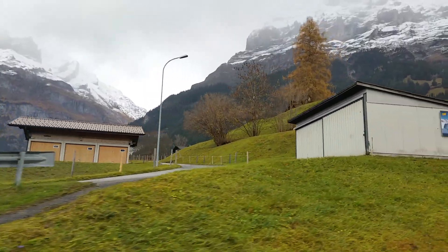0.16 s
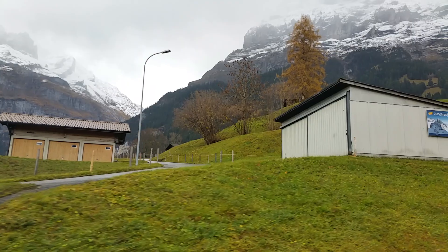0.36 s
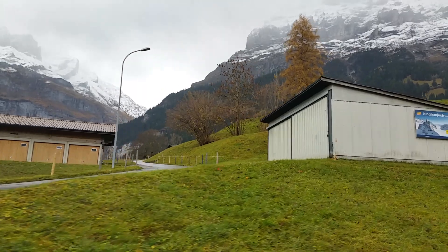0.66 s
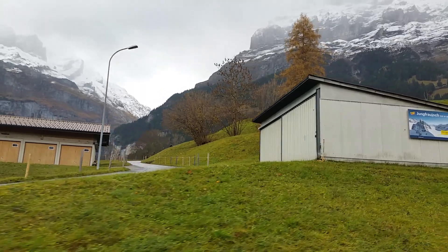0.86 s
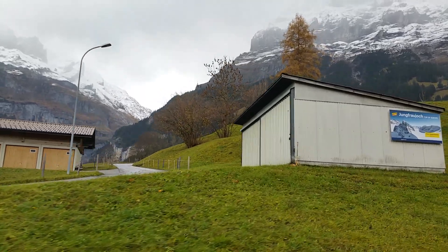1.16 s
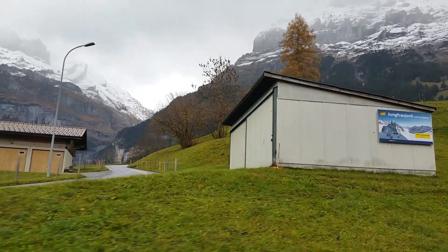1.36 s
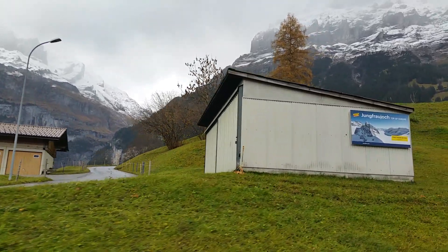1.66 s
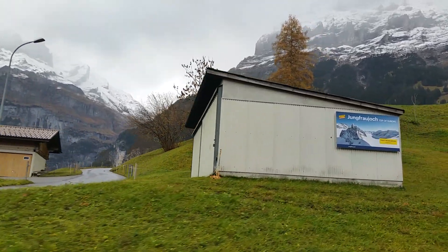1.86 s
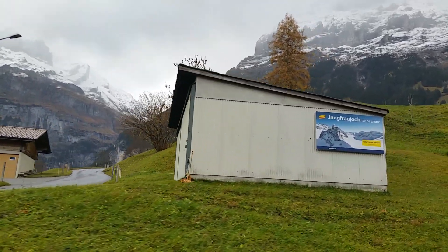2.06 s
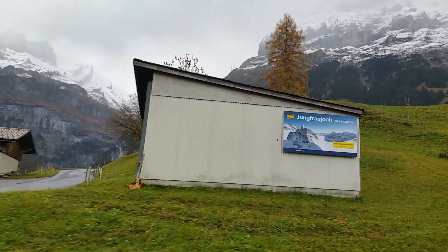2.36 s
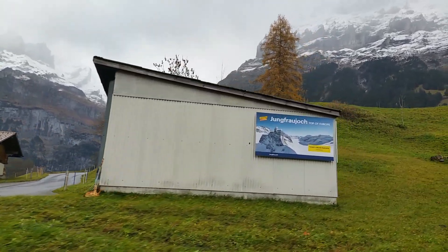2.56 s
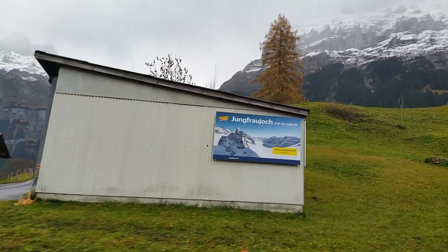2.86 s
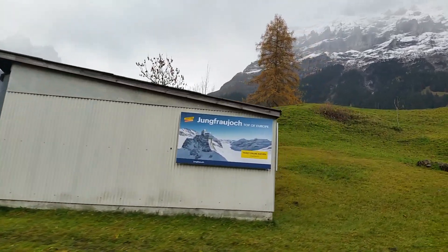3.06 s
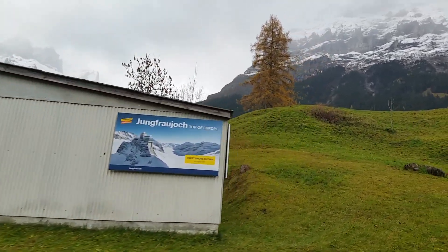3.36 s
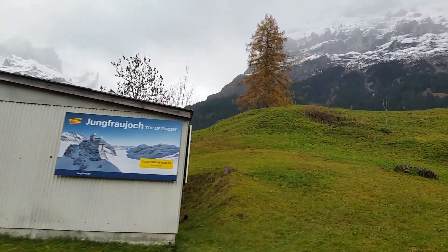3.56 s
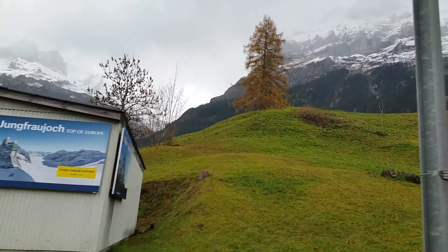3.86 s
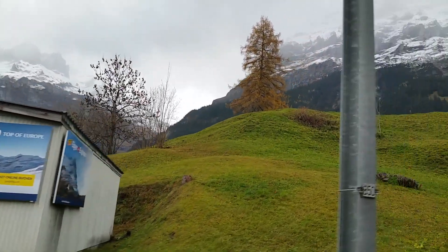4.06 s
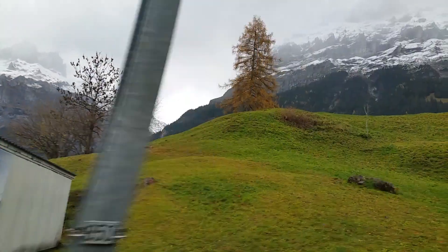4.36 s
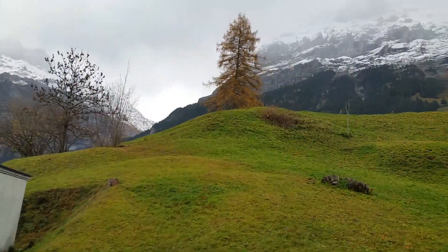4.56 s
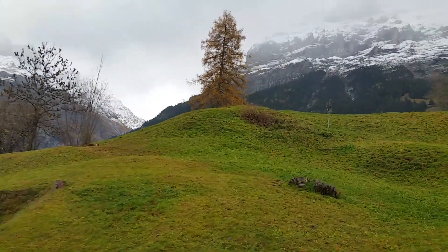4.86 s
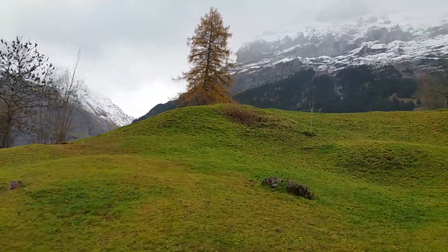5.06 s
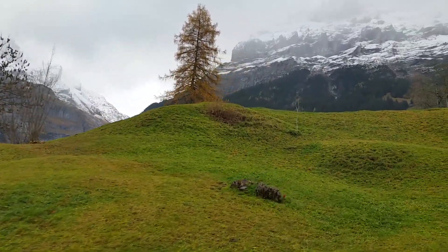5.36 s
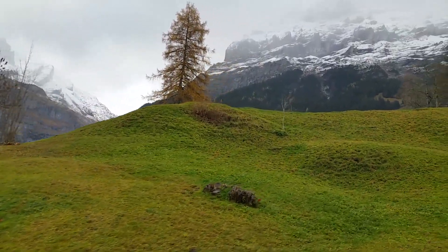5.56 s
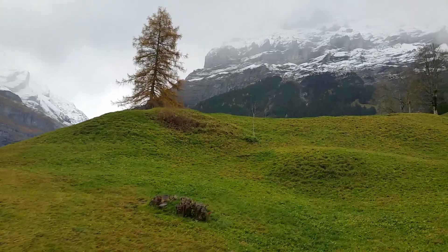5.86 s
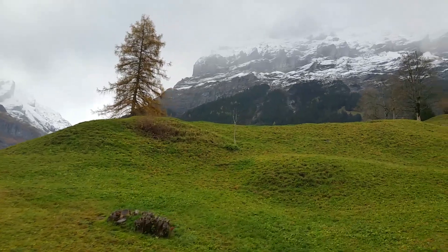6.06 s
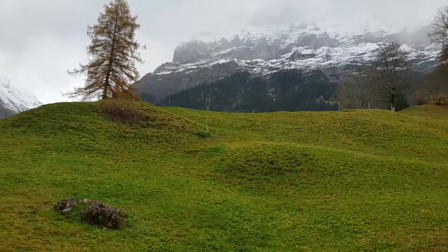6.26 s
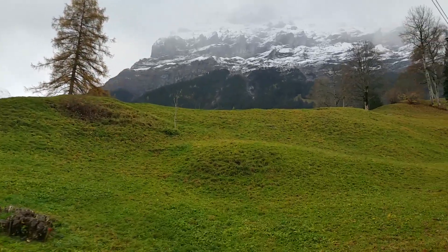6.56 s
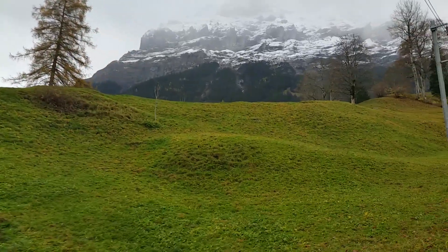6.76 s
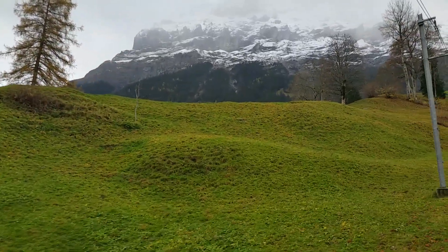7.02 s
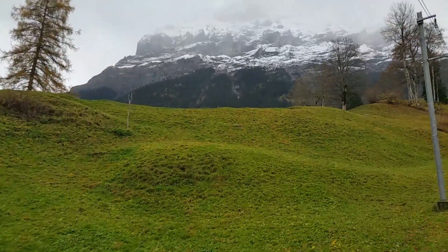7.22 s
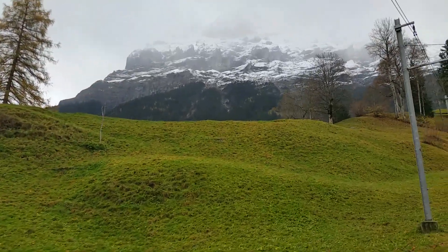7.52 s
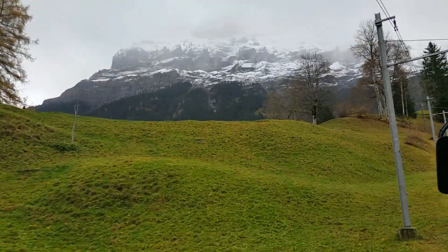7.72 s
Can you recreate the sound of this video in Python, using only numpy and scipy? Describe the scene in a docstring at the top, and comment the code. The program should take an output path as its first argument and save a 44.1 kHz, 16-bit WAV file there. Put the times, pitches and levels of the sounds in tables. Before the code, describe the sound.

A hand-held phone in a train car captures continuous cogwheel drive hum near the pitch of a low musical note, wheel roar and grainy rolling noise. Soft hiss through the open window swells beside a building, then eases. Two short, woody thumps come from under the floor around four seconds, less than half a second apart. The hum keeps wavering, sinking almost imperceptibly in pitch, with no stop.

```python
"""Inside a rack-railway car

A slowly climbing car with an open window, heard at the two microphone ports of a hand-held phone.
The pinion meets the rack tooth by tooth: sines on multiples of the tooth rate hum, and gear pairs
whine between them. Shaped noise makes the rumble of the wheels and the hiss from outside.
A rail joint knocks through the floor, whose modes ring as decaying sines."""
import sys
import numpy as np
from scipy import signal
from scipy.fft import rfft, irfft
from scipy.io import wavfile

SR = 44100
rng = np.random.default_rng(int(sys.argv[2]) if len(sys.argv) > 2 else 0)


def nominal_scale(level):
    """Amplitude ratio for a level in decibels (scalar or array-like)."""
    x = np.asarray(level, float) / 20
    return 10 ** x


def materialize(psi):
    """Save the field psi as 16-bit PCM at rate SR to the path in sys.argv[1].

    A 1-D psi becomes a single channel; in a 2-D psi each row is a channel.
    """
    bounded = np.clip(np.atleast_2d(psi).T, -1, 1)
    quanta = np.round(bounded * 32767).astype(np.int16)
    wavfile.write(sys.argv[1], SR, quanta)


N = 347949   # length in samples

# How fast the pinion runs along the rack. Each row: time in seconds, rack teeth per second.
TOOTH_RATE = [(0.0, 55.28), (2.15, 54.88), (3.59, 54.58), (4.3, 54.47), (5.74, 54.09), (6.8, 53.97),
              (7.89, 53.97)]
# The loudest hum, three times the tooth rate, swells and sags. Each row: time in seconds, level in dB.
HUM_LEVEL = [(0.0, -19.5), (0.55, -21.5), (1.25, -18), (2.2, -21.5), (2.6, -26), (3.2, -21.5), (3.9, -23),
             (4.4, -20.5), (4.65, -23.5), (4.9, -18), (6.2, -19.5), (6.8, -24.5), (7.3, -19), (7.89, -20.5)]
# Brief chance rises and dips in level around the hum's pitch, where hum and rumble noise meet.
# Each row: middle in seconds, change in dB.
HUM_CHANCE_CHANGES = [(0.47, -5.5), (0.77, 3), (1.06, -5), (1.72, -9.5), (3.02, -4), (3.22, 4.5),
                      (3.48, -5), (3.89, -17), (4.42, 4.5), (4.57, -5), (5.32, -4.5), (5.68, -3),
                      (6.03, -5), (7.0, 7.5), (7.14, -7), (7.63, -2)]
HUM_CHANGE_S = 0.045
TEETH_PER_TURN = 20.1   # of the pinion
# Tones whose strength wanders as the car body and gear load change. Each entry: multiple of the tooth rate.
WANDERING_MULTIPLES = [1, 2, 4, 6, 6.1, 12.2, 17.2, 24.4]
# How each of them wanders. Each row: base level in dB, dB gained per tooth a second of slowing,
# share of the outside noise's swing (below 0: it moves the opposite way).
WANDER_RULES = [(-35, -2, 0), (-27.5, -3.5, -0.0065), (-33, 1.5, 0.87), (-31.5, -2.5, -0.86),
                (-34.5, 0, -0.6), (-32.5, -6.5, 0.62), (-45.5, 3.5, -0.26), (-57, 9, 0.23)]
WANDER_DB, WANDER_HZ = 1.0, 1.2   # slow chance on top: spread and pace
# Tones with steadier strength. Each entry: multiple of the tooth rate.
STEADY_MULTIPLES = [4.85, 5, 7, 8, 9, 9.15, 10, 11, 13, 14, 15, 21.4, 27.3, 30.5, 36.6, 42.7]
# Their strength halfway on to the next rail. Each entry: level in dB.
STEADY_LEVELS = [-36, -38, -45.5, -43, -44, -48, -46, -56, -46.5, -55.5, -53.5, -58.5, -57.5, -62.5, -59,
                 -65]
# Uneven teeth smear each tone.
HUM_SMEAR_DB = -13   # beside the tone
# Smear of the wandering tones. Each entry: dB beside the tone.
WANDERING_SMEAR = [0, -9, 2, -5, -6, -4, -5, -1.5]
# Smear of the steady tones. Each entry: dB beside the tone.
STEADY_SMEAR = [-3, -2, 4.5, -2, 2, 3, 6, 3, 2, -2, 4.5, 6, 7, 7, 8, 8]
SMEAR_HZ, SMEAR_HZ_PER_MULTIPLE = 6.4, 0.36   # higher tones are shaken faster
# How the tones lean to one side. Each row: frequency in Hz, left minus right in dB.
TONE_BALANCE = [(60, -3), (150, -6), (370, -3), (910, 1.5), (2260, -6), (5590, -9.5), (13800, 3.0)]
ROAR_DB, ROAR_FADE_DB_PER_S = -0.17, 0.17   # low wheel roar against its spectrum
NEXT_RAIL_S, NEXT_RAIL_DB, NEXT_RAIL_EASE_S = 4.63, -2, 0.12   # past the joint the roar is softer
NEXT_RAIL_LOW_DB, NEXT_RAIL_HIGH_DB = -2.5, 2.5   # there the low steady tones sink, the high ones gain
# Rolling noise against its spectrum. Each row: time in seconds, change in dB.
ROLLING_LEVEL = [(0.0, -2), (0.35, 0.7), (0.6, -2.5), (1.5, -0.5), (3.55, -0.3), (3.7, 2.2), (5.0, 0.3),
                 (5.35, -1.5), (5.7, 0.6), (7.2, 1.3), (7.89, -2)]
# Colour of the low wheel roar. Each row: frequency in Hz, left in dB per Hz, right in dB per Hz.
ROAR_SPECTRUM = [(20, -62, -64), (46.6, -56, -46), (59.6, -60, -69), (72, -53.5, -45), (92, -57.5, -49),
                 (156, -43, -39.5), (159, -44.5, -43.5), (181, -52, -44.5), (198, -47, -44.5),
                 (251, -56, -51.5), (300, -54, -51), (423, -59.5, -54), (617, -54.5, -52),
                 (830, -61.5, -55.5), (1170, -69, -65.5)]
# Outside hiss, strongest while a wall stands near the track; only its swing about the mean counts.
# Each row: time in seconds, level in dB.
OUTSIDE_LEVEL = [(0.0, -49), (0.3, -47), (1.9, -44.5), (2.2, -43), (3.5, -42.5), (4.85, -42.5),
                 (5.3, -44.5), (5.55, -43), (7.2, -46), (7.89, -46)]
TOP_FADE_DB_PER_S = 0.2
# Brief surges and dips in the level of the hiss, partly shared by the wheel noise.
# Each row: middle in seconds, change in dB.
SURGES = [(0.15, 0), (0.44, 2), (0.57, 1.5), (0.97, 3), (1.12, 5), (1.32, 3.5), (1.69, 4), (2.2, 3),
          (2.33, -1), (2.44, 2), (2.93, 4), (3.45, 3), (3.68, 1), (3.87, 1.5), (4.29, 5), (4.41, -2),
          (4.47, 4.5), (4.61, -0.5), (4.75, 5), (4.87, 5.5), (5.15, 3), (5.76, 0.5), (6.31, 5),
          (6.47, -3.5), (7.36, 4), (7.44, 3.5), (7.54, -3.5), (7.75, 0.5)]
SURGE_S = 0.024
# Colour of the outside hiss. Each row: frequency in Hz, left in dB per Hz, right in dB per Hz.
HISS_SPECTRUM = [(3270, -83.5, -80.5), (4050, -83, -72.5), (4380, -81.5, -73.5), (4980, -85, -71.5),
                 (5650, -84.5, -74), (6490, -92.5, -82.5), (6990, -95, -84.5), (7550, -101, -101),
                 (8300, -93, -87.5), (9250, -85.5, -87.5), (10300, -86.5, -94), (11000, -89, -100),
                 (12000, -88.5, -93), (13000, -90.5, -91), (14200, -94, -96)]
# What the two ports share. Each row: frequency in Hz, likeness from 0 to 1, lead of the left port in radians.
PORT_LIKENESS = [(40, 0.57, .05), (160, 0.92, 0.14), (400, 0.83, 0.39), (700, 0.97, 0.64),
                 (1100, 0.89, 1.16), (1760, 0.5, 1.94), (2670, 0.04, 3.88), (4020, 0, 5.74),
                 (14000, 0.05, 20.4)]
# Blows of the rail joint under the wheels. Each row: time in seconds, strength in dB, centre in Hz.
KNOCKS = [(3.856, -12.5, 645), (3.860, -11, 300), (3.878, -7.5, 148), (4.265, -7, 300), (4.270, -12.5, 500),
          (4.287, -7, 350), (4.293, -17, 78), (4.350, -22, 50)]
# Ways the floor rings. Each row: frequency in Hz, strength in dB, seconds to fall by 60 dB.
FLOOR_MODES = [(50, 6.5, 0.53), (70, -1, .4), (148, 1.5, 0.046), (230, 8.5, 0.03), (300, -6, 0.051),
               (514, 6, 0.017), (613, 1, 0.038), (1047, 2, 0.059), (1450, -8, .05)]
# Colour of the middle rolling noise. Each row: frequency in Hz, left in dB per Hz, right in dB per Hz.
ROLLING_SPECTRUM = [(880, -56, -54), (1070, -69.5, -64.5), (1435, -67, -65), (2270, -73, -73),
                    (2660, -86.5, -79), (2830, -76.5, -76.5), (3060, -83, -84.5)]
# Borders between the bands of hiss. Each entry: frequency in Hz.
HISS_EDGES_HZ = [3100, 4300, 5500, 7800, 10000, 12000, 15500]

SECONDS = np.arange(N) / SR
PLUS_MINUS = np.array([[1], [-1]])   # left port up, right port down


def in_time(rows):
    """Draws straight lines between the rows of a table whose first column is time."""
    s, *columns = np.transpose(rows)
    return [np.interp(SECONDS, s, column) for column in columns]


def at_hz(points, hz, column=1):
    """Reads a table at any frequency, on a logarithmic frequency scale."""
    points = np.array(points)
    return np.interp(np.log(hz), np.log(points[:, 0]), points[:, column])


def drift(rate_hz, size=1):
    """Slow chance of spread 1: noise at every 40th sample through a double one-pole low-pass."""
    r = np.exp(-2 * np.pi * rate_hz * 40 / SR)
    noise = rng.standard_normal((size, N // 40 + 1502))
    slow = signal.lfilter([1], [1, -2 * r, r * r], noise)[:, 1500:]   # drop the filter's start
    return np.repeat(slow / slow.std(), 40, axis=1)[:, :N]


def brief(rows, width_s):
    """Bell-shaped rises and falls of level, in dB."""
    return sum(db * np.exp(-((SECONDS - s) / width_s) ** 2) for s, db in rows)


def once_a_turn(depth_db, turns):
    """A swell that returns with every turn of the pinion, at its top after the given share of a turn."""
    teeth = np.cumsum(in_time(TOOTH_RATE)[0]) / SR
    return depth_db * np.cos(2 * np.pi * (teeth / TEETH_PER_TURN - turns))


def outside_swing():
    """How far the outside noise lies above its mean, in dB."""
    level_db, = in_time(OUTSIDE_LEVEL)
    return level_db - np.mean(level_db)


def past_joint():
    """Rises from 0 to 1 as the car runs on to the next rail."""
    return 1 / (1 + np.exp((NEXT_RAIL_S - SECONDS) / NEXT_RAIL_EASE_S))


def port_noise(spectrum, low_hz, high_hz):
    """Noise between two edges, coloured for each port, partly shared, the left port leading."""
    hz = np.maximum(np.fft.rfftfreq(N, 1 / SR), 1)
    shared, left, right = rfft(rng.standard_normal((3, N)))
    alike = np.clip(at_hz(PORT_LIKENESS, hz), 0, 1)
    left = np.sqrt(alike) * shared + np.sqrt(1 - alike) * left
    left = left * np.exp(1j * at_hz(PORT_LIKENESS, hz, column=2))
    right = np.sqrt(alike) * shared + np.sqrt(1 - alike) * right
    edges = 1 / np.sqrt((1 + (low_hz / hz) ** 12) * (1 + (hz / high_hz) ** 12))
    per_hz = edges * np.sqrt(SR / 2)   # gives the noise a level of 0 dB per Hz between the edges
    left = left * nominal_scale(at_hz(spectrum, hz)) * per_hz
    right = right * nominal_scale(at_hz(spectrum, hz, column=2)) * per_hz
    return irfft([left, right], N)


def gear_tone(teeth, multiple, level_db, smear_db, own_share=0.055):
    """A sine locked to the tooth count; uneven teeth shake its height and phase, a little apart per port."""
    a, b, c, d = drift(SMEAR_HZ + SMEAR_HZ_PER_MULTIPLE * multiple, size=4)
    own = np.sqrt(own_share) * (c + 1j * d) * PLUS_MINUS
    smear = nominal_scale(smear_db) / np.sqrt(2) * (a + 1j * b + own)
    hz = multiple * TOOTH_RATE[0][1]
    lead = at_hz(PORT_LIKENESS, hz, column=2) * np.array([[1], [0]])   # left port only
    phase = 2 * np.pi * multiple * teeth + rng.uniform(0, 2 * np.pi) + lead
    wave = np.real((1 + smear) * np.exp(1j * phase))
    balance = nominal_scale(at_hz(TONE_BALANCE, hz) / 2 * PLUS_MINUS)
    return np.sqrt(2) * nominal_scale(level_db) * wave * balance


def drive():
    """Hum and whine of pinion and gears: all tones are locked to the count of rack teeth passed."""
    speed, = in_time(TOOTH_RATE)
    teeth = np.cumsum(speed) / SR
    slowed = speed[0] - speed
    outside_db = outside_swing()

    hum_db = in_time(HUM_LEVEL)[0] + once_a_turn(depth_db=0.8, turns=0.13)
    hum_db = hum_db + brief(HUM_CHANCE_CHANGES, HUM_CHANGE_S)
    out = gear_tone(teeth, multiple=3, level_db=hum_db, smear_db=HUM_SMEAR_DB)

    wander_db = []
    for base_db, gain_db, follows in WANDER_RULES:
        chance_db = WANDER_DB * drift(WANDER_HZ)[0]
        wander_db.append(base_db + gain_db * slowed + follows * outside_db + chance_db)
    for multiple, level_db, smear_db in zip(WANDERING_MULTIPLES, wander_db, WANDERING_SMEAR):
        out += gear_tone(teeth, multiple, level_db, smear_db)

    whine_db = wander_db[-2:]   # two fainter tones rise and fall with the highest wandering whines
    out += gear_tone(teeth, multiple=34.4, level_db=whine_db[0] - 8.5, smear_db=1.0)
    out += gear_tone(teeth, multiple=18.3, level_db=whine_db[1] - 2.5, smear_db=-3.5)

    for multiple, level_db, smear_db in zip(STEADY_MULTIPLES, STEADY_LEVELS, STEADY_SMEAR):
        change_db = NEXT_RAIL_LOW_DB if multiple < 20 else NEXT_RAIL_HIGH_DB
        out += gear_tone(teeth, multiple, level_db + change_db * (past_joint() - 0.5), smear_db)
    return out


def rumble(middle_share=0.48, roar_share=0.13):
    """Wheels on rail: a low roar that fades and a middle band that rises and falls; both share the surges."""
    surge_db = brief(SURGES, SURGE_S)
    low_db = ROAR_DB - ROAR_FADE_DB_PER_S * SECONDS + NEXT_RAIL_DB * past_joint()
    low_db = low_db + roar_share * surge_db + 0.68 * drift(10.4)
    roar = nominal_scale(low_db) * port_noise(ROAR_SPECTRUM, low_hz=12.0, high_hz=1005.0)
    middle_db = in_time(ROLLING_LEVEL)[0] + middle_share * surge_db
    middle_db = middle_db + once_a_turn(depth_db=0.4, turns=0.02) + 0.76 * drift(5.2)
    rolling = nominal_scale(middle_db) * port_noise(ROLLING_SPECTRUM, low_hz=1085.0, high_hz=3140.0)
    return roar + rolling


def hiss(patchy_db=0.9, top_follows=1.3, top_share=0.97):
    """Running noise through the window; all bands surge and dip, the top slightly less, and each flickers."""
    surge_db = brief(SURGES, SURGE_S) + once_a_turn(depth_db=0.64, turns=-0.00027) + 0.93 * drift(7.4)
    surge_db = surge_db + 0.57 * drift(30.0)   # quick flutter shared by all bands
    main_db = outside_swing() + surge_db
    top_fade_db = TOP_FADE_DB_PER_S * (SECONDS - N / 2 / SR)
    top_db = top_follows * outside_swing() + top_share * surge_db - top_fade_db
    out = 0
    for low, high in zip(HISS_EDGES_HZ, HISS_EDGES_HZ[1:]):
        band_db = (main_db if high < 8000 else top_db) + patchy_db * drift(8.0)
        out = out + nominal_scale(band_db) * port_noise(HISS_SPECTRUM, low, high)
    return out


def knocks(spread_octaves=0.66):
    """Each blow rings the floor modes near its own centre: hard blows the high ones, heavy ones the low."""
    s, blow_db, centre_hz = np.transpose(KNOCKS)
    out = np.zeros(N)
    for k, (hz, mode_db, t60) in enumerate(FLOOR_MODES):
        nearness = np.exp(-(np.log2(hz / centre_hz) / spread_octaves) ** 2)
        clicks = np.full(N, 1e-18)   # silent, but not exactly zero
        clicks[(s * SR).astype(int)] = nominal_scale(blow_db + mode_db) * nearness
        r = nominal_scale(-60 / (t60 * SR))   # what is left after each sample
        w = 2 * np.pi * hz / SR
        ring = signal.lfilter([0, np.sin(w)], [1, -2 * r * np.cos(w), r * r], clicks)
        out += (-1) ** k * ring   # every other mode starts downward
    soft = signal.sosfilt(signal.butter(2, 2200, fs=SR, output="sos"), out)   # the contact is not sharp
    return soft * nominal_scale(-2.2 * PLUS_MINUS)   # louder at the right port


def scene():
    """Drive, wheels, outside hiss and the rail joint together."""
    return drive() + rumble() + hiss() + knocks()


def roll_off(x):
    """The treble ends steeply here."""
    return signal.sosfilt(signal.butter(12, 14440, fs=SR, output="sos"), x)


def record(dry):
    """Gently rounds the peaks of the mix."""
    rounded = 1.224 * np.tanh(dry / 1.177)
    return roll_off(rounded)


dry = scene()
out = record(dry)
materialize(out)
```